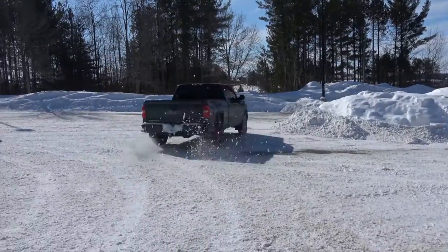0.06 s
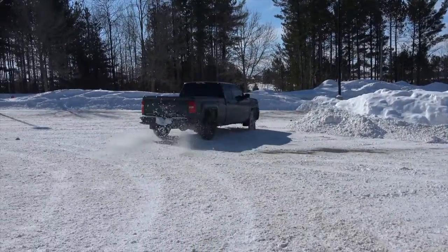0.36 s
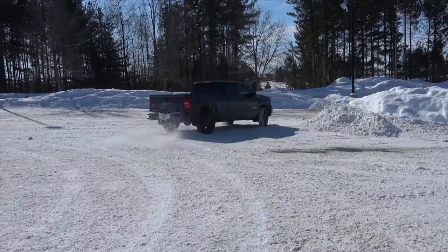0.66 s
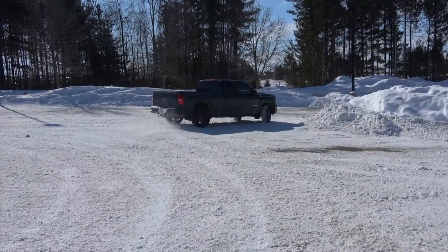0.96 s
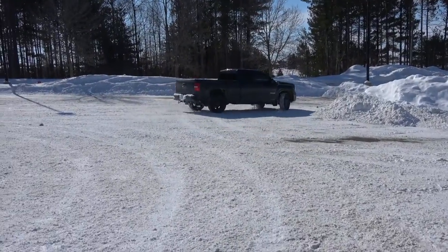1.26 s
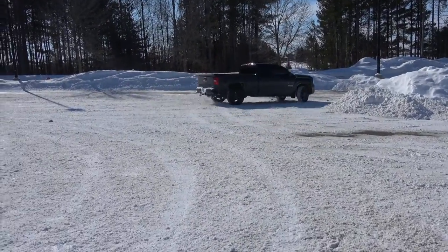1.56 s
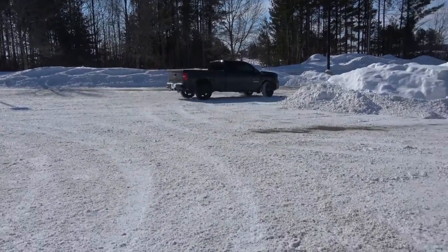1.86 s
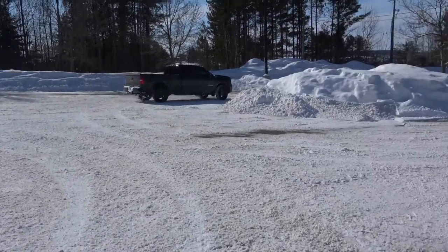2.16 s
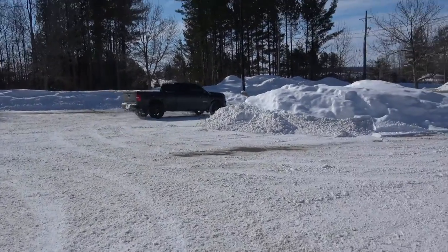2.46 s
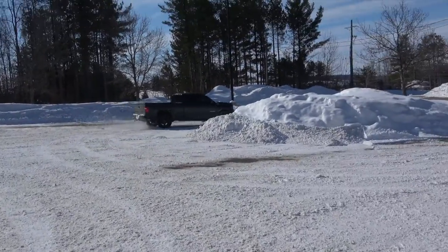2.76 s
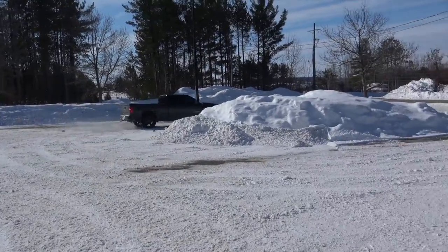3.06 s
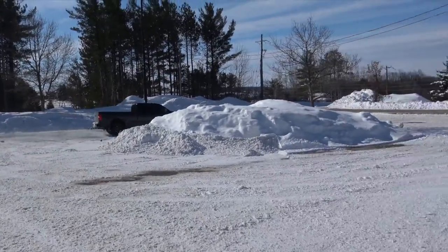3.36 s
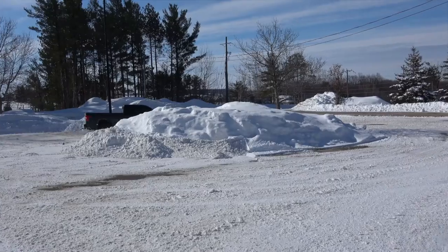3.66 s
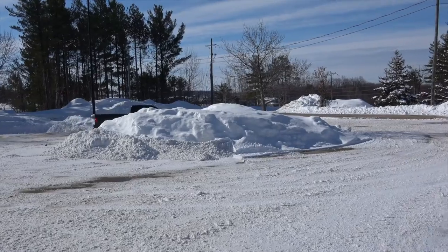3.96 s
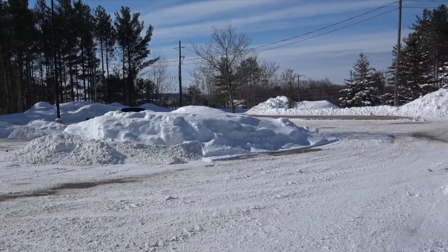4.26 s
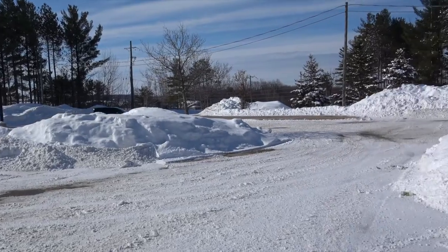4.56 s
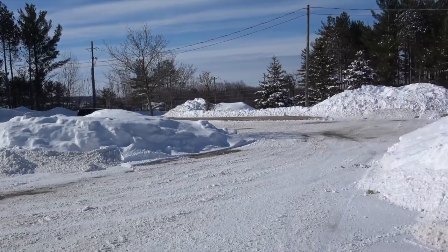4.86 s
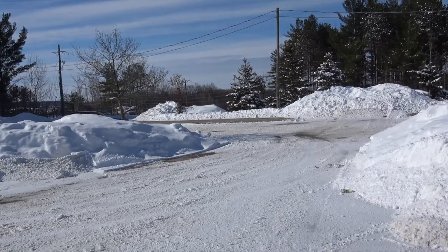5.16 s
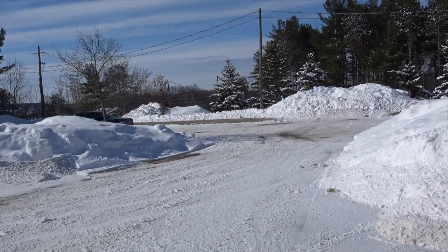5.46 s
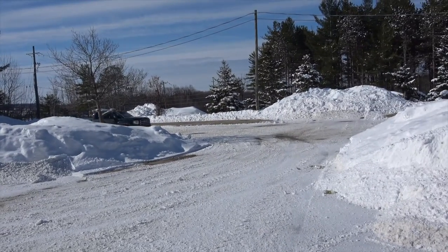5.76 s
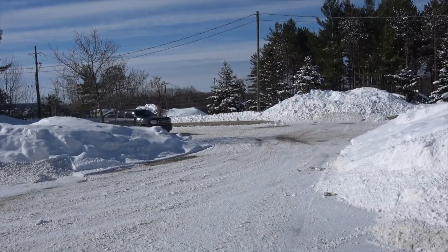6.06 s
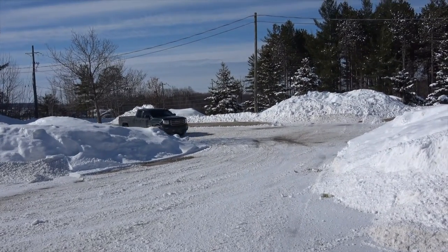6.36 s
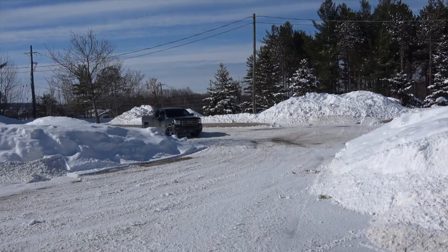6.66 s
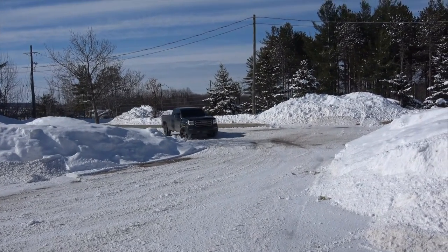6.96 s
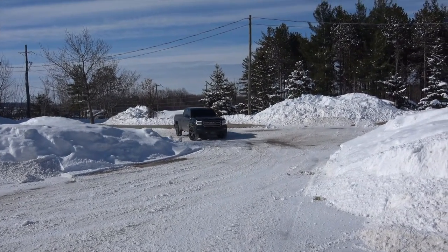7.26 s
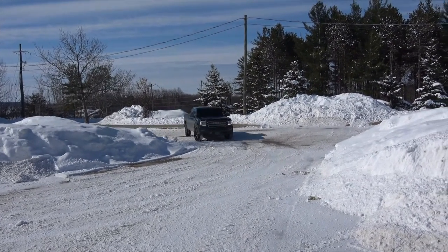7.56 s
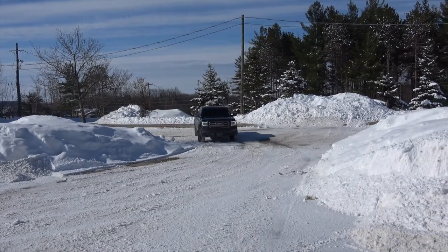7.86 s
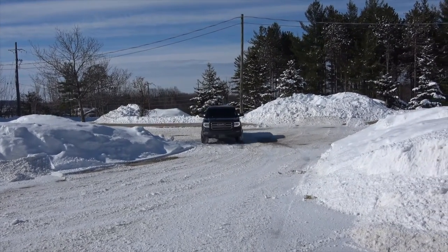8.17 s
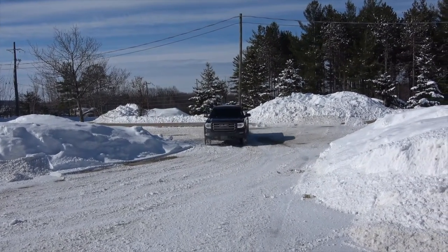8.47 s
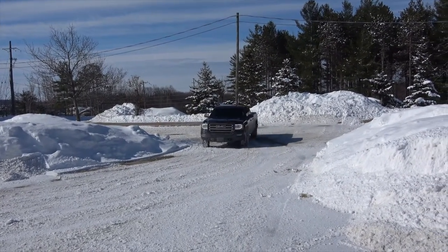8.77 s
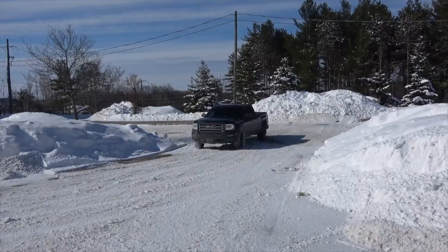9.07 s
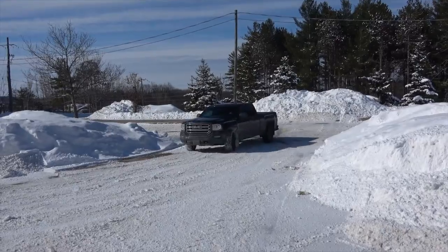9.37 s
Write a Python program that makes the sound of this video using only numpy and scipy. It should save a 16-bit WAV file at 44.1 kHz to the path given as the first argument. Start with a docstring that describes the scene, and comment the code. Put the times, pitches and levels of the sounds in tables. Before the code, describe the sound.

A V8 idles close by, slightly left, throughout: a loud, deep, lumpy drone with a soft hiss and faint ticking. Right at the start, a pickup spins its wheels on snow with a brief howl and squeal, and icy clods land in brittle ticks, mostly within the first second, as it pulls away. At about 2.2 seconds a gust rumbles softly on the microphone. From roughly 2.5 to 3.3 seconds the pickup revs hard and spins its wheels again, squealing, howling and spraying snow. It then grows faint behind a snow bank while the idle carries on. Light tyre scrapes come at about 6.3 and 6.8 seconds. From 8 seconds the pickup draws nearer, its engine rising and tyres rolling over snow. At about 8.9 seconds it skids in, ploughing the crust in three quick, loud crunches with hissing spray, until about 9.4 seconds.

```python
"""A pickup howls away over snow, spraying clods, while a V8 idles close by in a steady, lumpy drone.
The V8's uneven firing order rings two exhaust pipes; its engine bay hisses and ticks.
The pickup revs and spins its wheels again, passes behind a snow bank, turns back and skids in.
Its tyres roar, squeal as the tread sticks and slips, and plough the crust into a crunch.
A little after two seconds, a gust brushes the microphone."""
import sys
import numpy as np
from scipy import signal
from scipy.fft import rfft, irfft
from scipy.io import wavfile
from scipy.ndimage import map_coordinates

SR = 44100
rng = np.random.default_rng(int(sys.argv[2]) if len(sys.argv) > 2 else 0)


def dump(signal):
    """Clip the signal to [-1, 1] and save it as 16-bit WAV at the path in sys.argv[1]."""
    limited = np.clip(np.atleast_2d(signal).T, -1, 1)
    pcm = np.round(limited * 32767).astype(np.int16)
    wavfile.write(sys.argv[1], SR, pcm)


N = 414540
T = np.arange(N) / SR
FREQ = np.maximum(np.arange(N // 2 + 1) * SR / N, 1e-3)

# The V8's gently hunting idle. Each row: time in seconds, speed in rpm.
IDLE_RPM = [(0.0, 751.6), (0.49, 771.3), (0.93, 752.6), (1.62, 764.3), (2.6, 738.3), (2.84, 753.5),
            (3.27, 745.9), (3.67, 756.5), (4.55, 759.1), (5.24, 744.8), (5.43, 749.2), (5.83, 741.8),
            (6.41, 766.6), (7.1, 751.6), (8.03, 749.1), (8.27, 766.9), (9.4, 749.0)]
# The firing order. Each entry: the cylinder bank that fires, 0 or 1.
FIRING_BANK = [1, 1, 0, 1, 0, 0, 1, 0]
# The lump in the idle. Each entry, in firing order: relative puff strength in dB.
PUFF_DB = [8.5, -2, 5.5, -5, 6.5, -9.5, 8.5, -7]
# Exhaust pipe resonances. Each row: pitch in Hz, width in Hz, signed gain from bank 0, from bank 1.
PIPE_MODES = [(24.7, 1.6, 0.01, 0.2), (50.42, 3.3, -0.46, 0.63), (93.16, 15.22, -3, -5),
              (95.52, 6.8, 3.5, 6.5), (129.6, 11.5, -2.5, 4), (150.06, 9.1, 5, -0.62),
              (170.7, 2.4, 1.5, 0.33), (242.9, 14.1, 0.7543, 0.0053)]
# The drone's drift. Each row: time in seconds, relative level in dB, leftward pan in dB.
DRONE_DRIFT = [(0.05, -13, 9), (0.38, -13.5, 8.5), (1.96, -15, 9.5), (2.29, -15, 4.5), (2.55, -15, 3.5),
               (2.88, -15, 6.5), (4.69, -14.5, 3.5), (5.86, -13.5, 7.5), (6.44, -14, 3.5),
               (6.83, -14.5, 6.5), (9.05, -13.5, 5.5), (9.2, -13.5, 5.0)]
# Ticking valves. Each row: position in the cycle in firings, relative level in dB.
VALVE_TICKS = [(.76, -38), (6.73, -34.5)]
# Three louder ticks from the engine bay. Each row: time in seconds, relative level in dB.
LOUD_TICKS = [(.516, -23), (1.080, -26), (1.136, -24)]

# The pickup driver's foot. Each row: time in seconds, firing rate in Hz, throttle from 0 to 1.
REVS = [(0, 213.8, 0.21), (.65, 235.2, .5), (1.2, 203.6, 0.34), (2.0, 158.6, 0.27), (2.6, 194.4, 0.71),
        (2.9, 232.4, 0.99), (3.3, 191.8, .75), (3.8, 161, 0.4), (7.6, 167.4, 0.06), (8.3, 202, 0.27),
        (8.85, 234.2, 0.22), (9.4, 199.2, 0.26)]
# The pickup's loop round the lot. Each row: time in seconds, distance in metres.
ROUTE = [(0, 10.8), (1, 22.7), (1.9, 33.7), (4.5, 46.6), (6.7, 32.8), (7.5, 33.2), (8.1, 21.1), (9.4, 12.3)]
# Wheelspins. Each row: peak time, rise and fall in seconds, then howl, squeal and spray levels in dB.
WHEELSPINS = [(.07, .15, .1, -31.5, -37.5, -48.5), (2.869, 0.19, 0.25, -28.5, -44, -44.5),
              (5.52, .05, 0.067, -56, -56, -62)]
# Tyres scrubbing sideways. Each row: peak time, rise and fall in seconds, level in dB.
SCRUBS = [(6.331, 0.029, .04, -43), (6.84, 0.081, .1, -45), (8.93, 0.039, 0.034, -34.5)]
# The skid's three bites. Each row: peak time, rise and fall in seconds, crunch and spray levels in dB.
SKID_BITES = [(8.995, 0.03, 0.046, -25, -31), (9.13, 0.063, 0.042, -23.5, -31),
              (9.27, 0.11, 0.077, -24.5, -38)]
# The biggest snow clods landing. Each row: start in seconds, relative level in dB, ring in Hz.
BIG_CLODS = [(0.111, -24, 7000), (0.12, -29, 9000), (.310, -33, 8000), (.366, -29, 7000), (.372, -29, 4600),
             (0.389, -26, 4200), (.407, -31, 4000), (0.474, -32, 8500), (.722, -35, 4800),
             (0.738, -26, 4320)]

# Parts that ring. Each row: pitch in Hz, width in Hz, relative level in dB.
SHELL_MODES = [(299.2, 4.3, 4), (351, 1.3, 0), (459, 3.5, -6.5), (491.5, 2.7, 2), (634.5, 16, -7.5),
               (658, 1.2, 4.5)]  # thin silencer shell
BLOCK_MODES = [(560, 200, 0), (780, 200, -5.5), (1080, 340, -10.5), (2300, 830, -18)]  # engine block, rung by each tick
HOWL_MODES = [(358, 19, 11.5), (1066, 47, 4.5), (1330, 160, -1), (1457, 46, -8), (1750, 200, -4),
              (2003, 92, -7), (2550, 150, -20.5), (3830, 130, -12), (5100, 200, -15.5)]  # spinning wheels
SQUEAL_MODES = [(694, 90, -11.5), (1046, 41, -0.5), (1360, 75, -16), (3680, 190, -25.5), (4940, 110, -22.5)]  # stick-slipping tread

# Tone colours. Each row: frequency in Hz, relative level in dB.
BAY_EQ = [(60, 2.5), (200, 8), (320, -3.5), (500, -4), (680, -6.5), (850, -7.5), (1050, -11.5),
          (1500, -13.5), (2600, -19.5), (4300, -24.5), (6000, -32.5), (10000, -39.5), (15000, -45)]  # engine bay and surroundings
THROAT_EQ = [(110, -31), (170, 3), (220, 3.5), (280, -5), (360, -2), (440, -6.5), (530, -4), (590, -10),
             (670, -7.5), (790, -22), (1300, -37)]  # pickup's exhaust and intake
ROLLING_EQ = [(400, -10.5), (720, -3), (1050, -2), (1500, -7.5), (2200, -10), (3200, -16.5), (5000, -26),
              (9000, -31.5)]  # tyres rolling on snow
SCRUB_EQ = [(450, -7), (750, 3.5), (1100, 2), (1500, -9.5), (3000, -19), (8000, -33)]  # tyres sliding sideways
SPRAY_EQ = [(1500, -21.5), (2800, 2.5), (4000, -0.5), (6000, -1), (9500, -4), (12000, -10.5), (15000, -19)]  # thrown snow
CRUNCH_EQ = [(150, -5), (300, -12), (550, 2.5), (750, -3.5), (1100, 4.5), (1500, -1.5), (2000, -0.5),
             (3000, -8.5), (4500, -9.5), (8000, -32)]  # breaking crust
SHELL_EQ = [(270, 0.5), (700, -7.5), (900, -5), (1800, -39)]
HOWL_EQ = [(250, 0.5), (2200, -3.5), (4000, -11.0), (8000, -20.5)]
SQUEAL_EQ = [(550, -5.5), (5200, -3.5), (8000, -19)]
WIND_EQ = [(18, -11.5), (36, -8.0), (70, -0.5), (180, -9.0), (400, -35.5)]


def exhaust(firings, scatter_db=1.08, soft_hz=260, drive_db=28.5, shell_db=-47):
    """Each firing puffs into its bank's pipe; the uneven order makes the drone throb once a cycle."""
    k = np.arange(int(firings[-1]))
    bank = np.array(FIRING_BANK)[k % 8]
    times = np.interp(k + .51, firings, T) - .001 * bank  # bank 1 lands a millisecond early
    sizes = undb(np.array(PUFF_DB)[k % 8] + scatter_db * rng.standard_normal(len(k)))
    puffs = [clicks(times, sizes * (bank == side)) for side in (0, 1)]
    bank0, bank1 = rfft(puffs[0]), rfft(puffs[1])
    pipes = sum(mode(hz, width) * (a * bank0 + b * bank1) for hz, width, a, b in PIPE_MODES)
    # a valve opens gradually, so its puff has little treble
    soften = 1 / (1 + 1j * np.sqrt(2) * FREQ / soft_hz - (FREQ / soft_hz) ** 2)
    level_db, pan_db = curves(DRONE_DRIFT)
    drone = irfft(pipes * soften, N) * undb(drive_db + level_db - level_db.mean())
    shell = colour(ring(puffs[0] + puffs[1], SHELL_MODES), SHELL_EQ) * undb(shell_db)
    # only the main boom leans left; the sub and the top stay centred
    boom = irfft(rfft(drone) * np.abs(mode(135, 190)), N)
    return place(boom, pan_db) + (drone - boom) + place(shell, pan_db=-1.5)


def pickup(howl_gain, thrown_gain, engine_db=-41, throttle_db=23, tyre_db=-46, spray_db=-56):
    """Engine, tyres and flung snow; the driving sound fades with distance and behind the snow bank."""
    firing_hz, throttle = curves(REVS)
    # soft snow soaks up more than open air: 28 dB per tenfold distance, unity at 20 m
    distance_db = -28 * np.log10(curves(ROUTE)[0] / 20)
    # the snow bank ducks the spray fully; tyre rumble and engine bass bend round it
    shade_db = -12 * np.exp(-((T - 4.86) / 0.87) ** 2)
    roar = tyres(howl_gain, rolling_gain=undb(tyre_db + distance_db + .6 * shade_db))
    spray_gain = np.hypot(undb(spray_db + distance_db + shade_db), thrown_gain)
    spray = colour(grains(9000, 1.6), SPRAY_EQ) * spray_gain * flutter(1.4, 25)
    engine = pickup_engine(firing_hz, spin=howl_gain / howl_gain.max())
    engine *= undb(engine_db + throttle_db * throttle + distance_db + .3 * shade_db)
    body = engine + roar * flutter(1.5, 27)
    powder = colour(noise(), SPRAY_EQ) * spray_gain * undb(-27)
    return place(body, pan_db=1.0) + place(spray, pan_db=1.5) + wide(powder)


def pickup_engine(firing_hz, spin, rasp=.62, spin_rasp=.45, wobble=.008, odd_gain=.45):
    """A growl of crank orders over gas noise, chopped by the firings and raspier in a wheelspin."""
    phase = 2 * np.pi * np.cumsum(firing_hz * (1 + wobble * wander(12.8))) / SR
    orders = np.arange(3, 19)
    offsets = rng.uniform(0, 2 * np.pi, len(orders))
    # the two banks stress every second crank order
    tone = sum((odd_gain if k % 2 else 1) * np.sin(k * phase / 4 + p) for k, p in zip(orders, offsets))
    gas = colour(noise() * (1 + .6 * np.cos(phase)), THROAT_EQ)
    growl = colour(tone, THROAT_EQ) * undb(-5.5) * flutter(1.6, 8.4)
    return unit(growl + (rasp + spin_rasp * spin) * gas)


def tyres(howl_gain, rolling_gain):
    """Tyres crunch as they roll, howl as they spin and scrape as they slide sideways."""
    rolling = colour(grains(6000, 2.5), ROLLING_EQ)
    howl = colour(ring(noise(), HOWL_MODES), HOWL_EQ)
    scrub = colour(grains(3000, 2.5), SCRUB_EQ)
    scrub_gain = sum(swell(s, rise, fall) * undb(db) for s, rise, fall, db in SCRUBS)
    return howl * howl_gain + rolling * rolling_gain + scrub * scrub_gain


def wheelspin(squeal_slip=.33, squeal_lead_s=.16, spray_lead_s=.05):
    """Gains for howl, squeal and thrown snow follow the slip; squeal and snow lead the howl."""
    howl, sing, thrown = 0, 0, 0
    for s, rise, fall, howl_db, squeal_db, spray_db in WHEELSPINS:
        howl += swell(s, rise, fall) * undb(howl_db)
        slip = swell(s - squeal_lead_s, rise, fall)
        sing += np.tanh((slip / squeal_slip) ** 3) * undb(squeal_db)
        # thrown snow grows more slowly than the slip
        thrown += swell(s - spray_lead_s, rise, fall) ** .7 * undb(spray_db)
    return howl, sing, thrown


def squeal(gain, floor_db=-64, waver=.012):
    """Tread blocks stick and slip, ringing in an unsteady narrow note that never quite stops."""
    note = colour(ring(noise(), SQUEAL_MODES), SQUEAL_EQ)
    # the note bends as the grip comes and goes
    bent = map_coordinates(note, [np.cumsum(1 + waver * wander(7))], mode="mirror")
    return place(bent * np.hypot(gain, undb(floor_db)) * flutter(2.2, 22), pan_db=0.9)


def skid(judder_db=1.32, width_db=-23):
    """Sliding tyres plough the packed crust, which breaks in uneven bursts."""
    crunch_bites = [swell(s, rise, fall) * undb(db) for s, rise, fall, db, _ in SKID_BITES]
    spray_bites = [swell(s, rise, fall) * undb(db) for s, rise, fall, _, db in SKID_BITES]
    ploughing = np.linalg.norm(crunch_bites, axis=0)
    crunch = colour(grains(7000, 1.3), CRUNCH_EQ) * ploughing
    spray = colour(grains(14000, 2.7), SPRAY_EQ) * np.linalg.norm(spray_bites, axis=0)
    scatter = colour(noise(), CRUNCH_EQ) * ploughing * undb(width_db)
    return (place(crunch + spray, pan_db=-0.8) + wide(scatter)) * flutter(judder_db, 42.8)


def clods(decay_s=.0016, trim_db=-3, ring_q=3, count=14, shower_s=1.8, shower_hz=7000):
    """Icy lumps land with a brittle, ringing tick: the big ones amid a fading shower of small ones."""
    out, t = np.zeros(N), T[:1024]
    draws = rng.random((count, 2)) * [shower_s, 1]
    shower = [(s, -33 - 12.5 * s, shower_hz * (.5 + pitch)) for s, pitch in draws]
    for s, db, hz in BIG_CLODS + shower:
        crack = rng.standard_normal(len(t)) * np.exp(-t / decay_s)
        tick = .2 * crack + signal.lfilter(*signal.iirpeak(hz, ring_q, fs=SR), crack)
        start = int(s * SR)
        out[start:start + len(t)] += tick / np.abs(tick).max() * undb(db + trim_db)
    return place(out, pan_db=2.0)


def engine_bay(firings, hiss_db=-42.5, throb=.084, scatter_db=1.5, whine_db=-76):
    """The V8's pulsing mechanical hiss, two ticking valves, three louder ticks and a faint high whine."""
    pulsing = noise() * (1 + throb * np.cos(2 * np.pi * firings))
    hiss = colour(pulsing, BAY_EQ) * undb(hiss_db) * flutter(.44, 13)
    air = colour(noise(), BAY_EQ) * undb(hiss_db - 21.5)
    loud_s, loud_db = np.transpose(LOUD_TICKS)
    hits = clicks(loud_s, undb(loud_db))
    cycles = np.arange(0, firings[-1] - 8, 8)
    for position, db in VALVE_TICKS:
        sizes = undb(db + scatter_db * rng.standard_normal(len(cycles)))
        hits += clicks(np.interp(cycles + position, firings, T), sizes)
    # the heavy block and the bonnet muffle each tick
    muffle = signal.butter(3, 1500, fs=SR, output="sos")
    block = signal.sosfilt(muffle, ring(signal.unit_impulse(N), BLOCK_MODES))
    ticks = irfft(rfft(hits) * rfft(block / np.abs(block).max()), N)
    whine = ring(noise(), [(6370, 25, 0)]) * undb(whine_db)
    return place(hiss + ticks + whine, pan_db=-11.0) + wide(air)


def wind(full_s=2.27, attack_s=.17, hold_s=.4, release_s=.58, gust_db=-25.5, breeze_db=-49):
    """Low buffeting on the microphone: one gust over a light breeze."""
    rumble = colour(noise(), WIND_EQ)
    attack = np.minimum(T - full_s, 0) / attack_s
    release = np.maximum(T - full_s - hold_s, 0) / release_s
    gust = np.exp(attack - release) * undb(gust_db)
    return place(rumble * np.hypot(gust, undb(breeze_db)), pan_db=-5.5)


def undb(db):
    """Decibels to gain."""
    return 10 ** (np.asarray(db) / 20)


def unit(x):
    """Scale to rms 1."""
    return x / np.sqrt(np.mean(x ** 2))


def curves(table):
    """One automation curve for each column after the time."""
    s, *columns = np.transpose(table)
    return [np.interp(T, s, c) for c in columns]


def swell(peak_s, rise_s, fall_s):
    """A rounded peak of height 1 with exponential flanks."""
    return np.exp(1 - np.hypot(1, (T - peak_s) / np.where(T < peak_s, rise_s, fall_s)))


def mode(hz, width_hz):
    """Response of one resonance, gain 1 at its centre."""
    return 1 / (1 + 1j * (FREQ / hz - hz / FREQ) * hz / width_hz)


def ring(x, modes):
    """Play x through a set of resonances; rms 1."""
    return unit(irfft(rfft(x) * sum(undb(db) * mode(hz, width) for hz, width, db in modes), N))


def colour(x, eq):
    """Shape x with an EQ curve that rolls off past both ends; rms 1."""
    hz, db = np.transpose(eq)
    rolloff = 1 / np.sqrt((1 + (hz[0] / FREQ) ** 6) * (1 + (FREQ / hz[-1] / 2) ** 6))
    return unit(irfft(rfft(x) * rolloff * undb(np.interp(np.log(FREQ), np.log(hz), db)), N))


def noise():
    """White noise."""
    return rng.standard_normal(N)


def wander(rate_hz):
    """Smooth random motion up to about rate_hz; rms 1."""
    return unit(irfft(rfft(noise()) / (1 + (FREQ / rate_hz) ** 4), N))


def flutter(depth_db, rate_hz):
    """A gain that wavers at random around unity."""
    return undb(depth_db * wander(rate_hz))


def clicks(times, sizes):
    """Impulses at the given times in seconds."""
    return np.bincount(np.clip(times * SR, 0, N - 1).astype(int), sizes, N)


def grains(per_s, spread_db):
    """Snow crystals breaking: many small clicks, few large ones."""
    sizes = undb(spread_db * np.minimum(rng.exponential(size=N), 6))
    return unit((rng.random(N) < per_s / SR) * np.sign(noise()) * sizes)


def place(x, pan_db):
    """Pan by left minus right in dB, keeping the mid level."""
    lean = np.tanh(pan_db * np.log(10) / 40)
    return np.array([x * (1 + lean), x * (1 - lean)])


def wide(x):
    """Pure stereo width: opposite polarity left and right."""
    return np.array([x, -x])


def scene():
    """The V8 idling close by, the pickup out on the lot, and the wind."""
    rpm = curves(IDLE_RPM)[0]
    firings = np.cumsum(rpm) / 60 * 4 / SR  # running count: four a turn, eight a cycle
    howl, sing, thrown = wheelspin()
    idle = exhaust(firings) + engine_bay(firings)
    return idle + pickup(howl, thrown) + squeal(sing) + skid() + clods() + wind()


def record(dry, top_hz=15200):
    """A steep low-pass takes off the very top."""
    return signal.sosfilt(signal.ellip(8, .2, 70, top_hz, fs=SR, output="sos"), dry)


dry = scene()
out = record(dry)
dump(out)
```